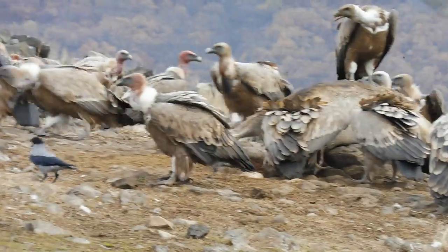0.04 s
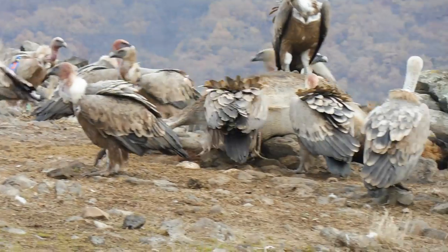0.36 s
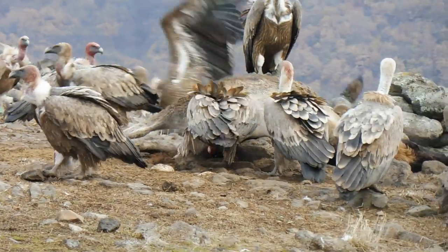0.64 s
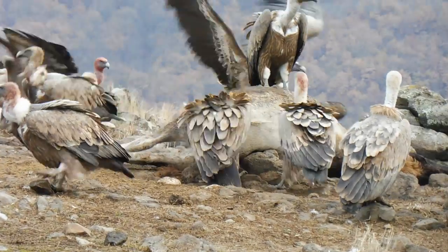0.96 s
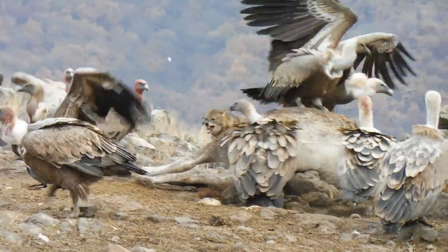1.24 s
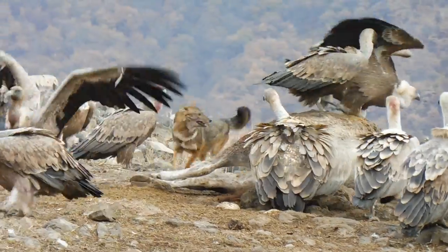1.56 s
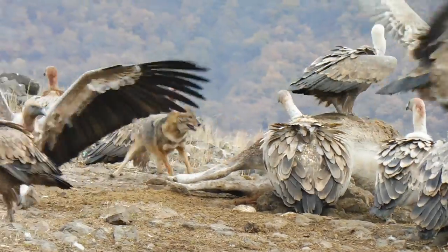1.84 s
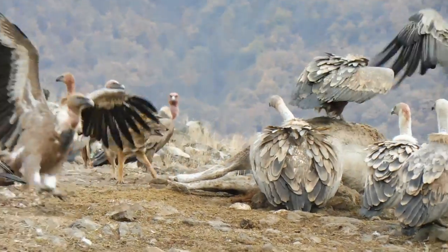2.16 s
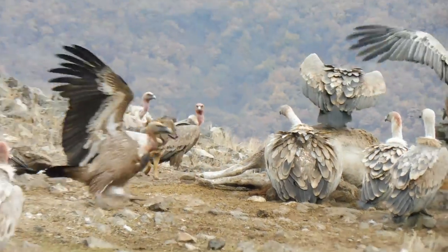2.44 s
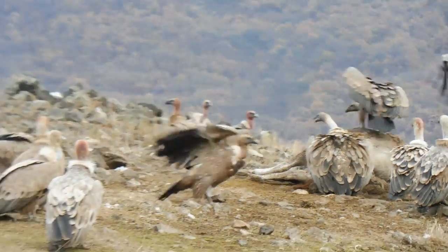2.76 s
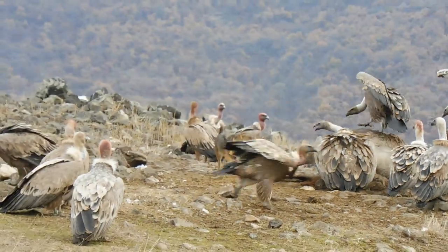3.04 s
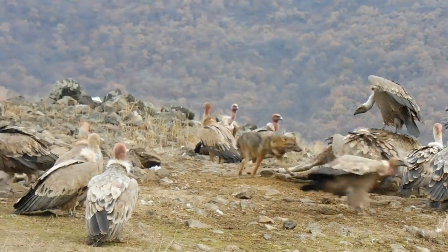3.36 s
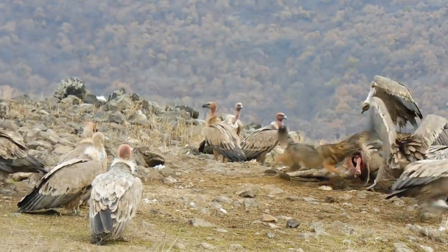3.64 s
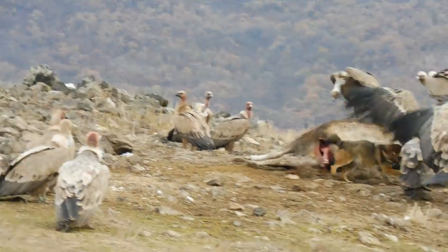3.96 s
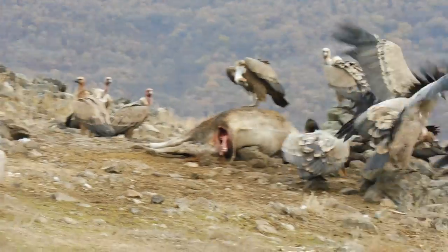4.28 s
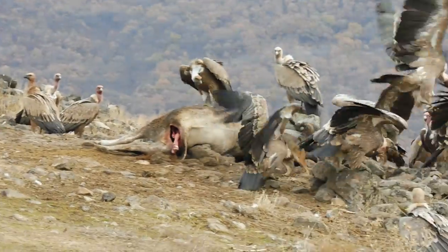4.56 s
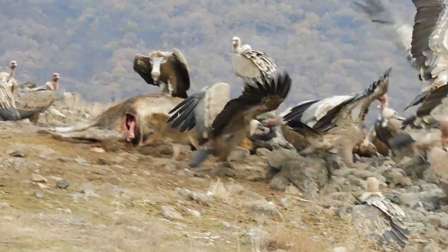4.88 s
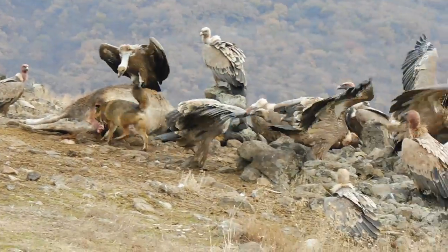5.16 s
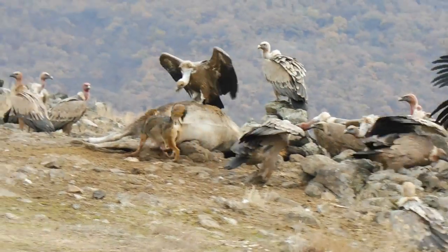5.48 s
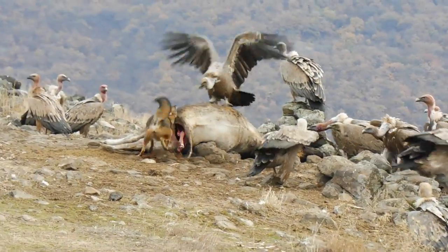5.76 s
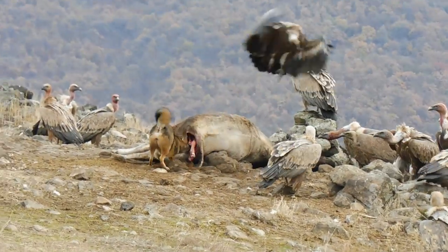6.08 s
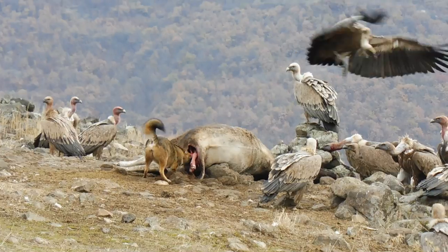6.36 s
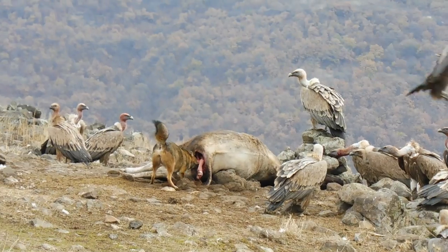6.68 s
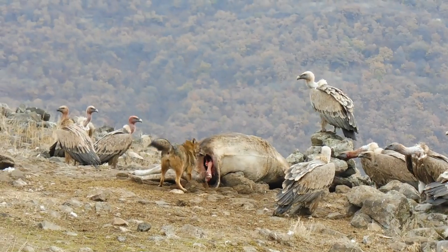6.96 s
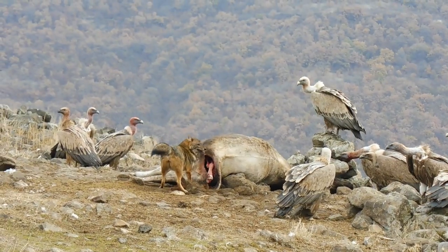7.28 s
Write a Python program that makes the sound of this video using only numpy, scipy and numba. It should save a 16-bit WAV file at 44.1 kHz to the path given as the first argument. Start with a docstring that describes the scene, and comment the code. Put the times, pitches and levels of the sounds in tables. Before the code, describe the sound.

Vultures give two harsh, rasping hisses edged with brief whistles, while wings and feet scuff dry ground in faint wind.

```python
"""Vultures at a carcass

Griffon vultures squabble with a jackal on a stony hillside. Air forced through throat and beak makes
two long, harsh hisses that swell and break into brief whistles. Wings and feet scuff the dry ground
and land with soft thuds. Faint wind lies behind. Close by, a camera hisses, ticks, knocks twice in
the hand and runs its zoom motor, which starts with a fading rasp."""
import sys
import numpy as np
from scipy import signal
from scipy.fft import rfft, irfft, next_fast_len
from scipy.io import wavfile
from numba import njit

SR = 44100
rng = np.random.default_rng(int(sys.argv[2]) if len(sys.argv) > 2 else 0)


def transcribe(signal):
    """Save signal, clipped to [-1, 1], as a 16-bit WAV file at the path in sys.argv[1]."""
    frames = np.atleast_2d(signal).T
    limited = np.clip(frames, -1, 1)
    pcm = np.round(limited * 32767).astype(np.int16)
    wavfile.write(sys.argv[1], SR, pcm)


N = 331632
TIME = np.arange(N) / SR

# Pushes of air, one curve each: t/s, effort/dB, beak opening (gain on the beak resonance)/dB
PUSH_CURVES = [
    [(3.745, -43, -4), (3.759, -46.5, 6), (3.775, -37.5, -1.5), (3.831, -39, -1), (3.843, -32.5, -2.5),
     (3.905, -36.5, 5), (3.927, -32.5, 1), (4.039, -36.5, 5), (4.085, -47, 8)],
    [(4.095, -48, 10), (4.113, -38.5, 8.5), (4.139, -33.5, -1), (4.209, -27.5, -3), (4.221, -32.5, 2),
     (4.245, -32, -9), (4.275, -42.5, -3), (4.32, -46, -3)],
    [(5.625, -51, 2), (5.739, -41, 6.5), (5.769, -31, 4), (5.847, -28, 4), (5.897, -25.5, -5.5),
     (5.921, -29, 1), (5.973, -33, -8.5), (6.001, -41, 5), (6.03, -48, -21)],
]
# Airway per push: throat f/Hz, width/Hz, level/dB; beak f/Hz, width/Hz, level/dB; jet level/dB;
# chest f/Hz, level/dB, fade/(dB/s); pitch sag/(oct/s)
AIRWAYS = [(2025, 1160, 1.5, 3280, 1950, 0, -18, 370, -20.5, 4, 0.0505),
           (2030, 880, 3, 3340, 1100, -0.5, -15, 345, -22.5, 3, 0.107),
           (2000, 990, 2.5, 2850, 650, 0, -12.5, 460, -25.5, 0, .55)]
# Spectra of the windpipe and of the jet at the beak: f/Hz, level/dB
WINDPIPE_SPECTRUM = [(300, -24), (850, -23), (1080, 9), (1200, -5.5), (1310, 4.5), (1450, 0), (1850, 4),
                     (2300, 2), (2900, 4), (3700, 3), (4700, 1), (5100, -20), (6500, 0.5), (12000, -2)]
JET_SPECTRUM = [(2500, -37), (4200, 3), (4900, 7), (5250, 5.5), (5500, -3), (5800, 3), (6400, -2.5),
                (7900, -9), (8600, -12.5), (11000, -16), (13000, -19)]
# Whistles: peak t/s, swell/s, fall/s, level/dB, f/Hz, glide/(oct/s), harmonics 2 and 3/dB, jitter/ratio
WHISTLE_TONES = [(3.931, 0.081, 0.063, -23.5, 2284, -0.22, -25, -25.5, 0.021),
                 (3.995, .04, 0.11, -31.5, 2154, -0.082, -18, -25, 0.016),
                 (4.125, 0.0212, .03, -30.5, 2312, 0, -25, -21, 0.018),
                 (5.633, 0.016, .045, -36, 1183, 0, 14, 1, 0.0054),
                 (5.705, 0.043, 0.063, -37.5, 1243, -.3, 9, -5.5, .014),
                 (5.998, 0.028, 0.027, -33, 1332, -1.04, -9, -9, 0.011)]
# Chest growls: centre t/s, sigma/s, level/dB, f/Hz, glide/(oct/s)
GROWL_TONES = [(3.869, .05, -48.5, 345, 1), (3.972, .02, -46, 345, -2), (4.131, 0.019, -42, 330, -0.5),
               (4.172, .02, -46, 350, 3)]
# Scuffs of wings and feet, plus the zoom motor's fading rasp at 1.89 s: t/s, level/dB, t60/s, strokes
SCUFF_EVENTS = [(.303, -49.5, 0.13, 1), (.868, -51.5, 0.092, 1), (1.36, -54.5, .3, 1),
                (1.886, -50, 0.84, 1), (2.788, -44, 0.074, 1), (3.709, -37.5, 0.26, 3),
                (3.959, -38.5, 0.31, 3), (4.63, -53.5, .35, 1), (5.92, -37, 0.22, 3),
                (6.162, -38.5, 0.21, 3), (6.295, -49.5, .16, 1)]
# Spectrum of those scuffs and that rasp: f/Hz, level/dB
SCUFF_SPECTRUM = [(60, -24), (150, -26), (400, 2), (600, -5), (780, 3.5), (980, 2), (1180, -5), (1700, 4),
                  (2500, -5), (3200, -1), (5000, -3.5), (6200, -14), (7500, -9), (12000, -12.5)]
# Dry ticks and knocks: t/s, level/dB, f/Hz, t60/s
TICK_EVENTS = [(.322, -49.5, 2190, 0.031), (1.8894, -34.5, 3080, .02), (1.9073, -33.5, 1630, 0.027),
               (2.0428, -38, 1470, 0.018), (2.8033, -33.5, 4070, 0.019), (2.9188, -32, 3680, 0.017),
               (2.969, -43.5, 3400, .026), (3.361, -46, 2970, 0.01), (4.3294, -32, 2160, 0.036),
               (4.3784, -35.5, 1900, 0.036), (4.6444, -36.5, 2600, 0.01), (7.4974, -43.5, 1990, .031)]
# Soft low thuds of feet and wings, plus two camera-handling knocks near 4.35 s:
# t/s, level/dB, f/Hz, half length/s
THUD_EVENTS = [(.872, -50.5, 396, 0.008), (1.11, -56, 125, 0.015), (1.275, -51, 128, .012),
               (2.32, -53, 610, 0.012), (2.375, -54, 290, 0.026), (4.332, -45, 171, .004),
               (4.384, -47, 170, 0.0043), (4.641, -53, 145, 0.02), (4.682, -48, 342, 0.0056),
               (5.044, -47, 485, 0.0088), (5.23, -52, 327, 0.014), (5.272, -50, 470, 0.012),
               (7.507, -52, 365, .011)]
# Flurries in the flock: centre t/s, half length/s, rise/dB
FLOCK_FLURRIES = [(0.046, 0.23, 5.5), (1.3, 0.38, 5), (2.306, 0.41, 5), (4.543, .55, 6.5), (6.203, 0.57, 2)]
# Spectra of wind, far rustle and camera hiss: f/Hz, level/dB
WIND_SPECTRUM = [(25, -11.5), (60, -4.5), (100, -2), (140, 1), (260, 1), (400, -1.5), (700, -2.5),
                 (1500, -30)]
RUSTLE_SPECTRUM = [(400, -26), (900, 1.5), (1400, 4.5), (2100, 3.5), (3500, 0), (6000, -5), (13000, -11.5)]
CAMERA_SPECTRUM = [(30, -0.5), (150, -12), (450, -0.5), (750, 2), (1040, 4.5), (1200, -10), (2500, -31),
                   (6000, -4), (13000, -13)]
# Resonances of camera hiss and zoom motor: f/Hz, width/Hz, level/dB
CAMERA_RESONANCES = [(4875, 880, 0), (7500, 1240, -2)]
ZOOM_RESONANCES = [(2400, 1700, 0), (4970, 570, 4.5), (7700, 570, 0.5), (9170, 1800, -4)]


def vultures():
    """Two pushes of air make the first call, one the second; whistles and growls ride on them."""
    return sum(hiss(curve, airway) for curve, airway in zip(PUSH_CURVES, AIRWAYS)) + whistles() + growls()


def hiss(curve, airway, throat_oct_per_db=.005, chest_oct_per_db=.006, jet_follow=.54, chest_follow=.33):
    """Turbulent air rings chest, throat and beak, then leaves as a bright, spitting jet."""
    (throat_hz, throat_width_hz, throat_db, beak_hz, beak_width_hz, beak_db,
     jet_db, chest_hz, chest_db, chest_fade_db_per_s, sag_oct_per_s) = airway
    at, out = around(curve), np.zeros(N)
    effort_db, opening_db = along(curve, TIME[at])
    age_s = TIME[at] - (curve[0][0] + curve[-1][0]) / 2
    sag = 2 ** (-sag_oct_per_s * age_s)
    throat_hz = throat_hz * sag * 2 ** (throat_oct_per_db * opening_db)
    chest_hz = chest_hz * sag * 2 ** (chest_oct_per_db * (effort_db - np.mean(curve, axis=0)[1]))
    slack_db = effort_db - effort_db.max()
    chest_db = chest_db - (1 - chest_follow) * slack_db - chest_fade_db_per_s * age_s
    chop = rasp(flap_hz=230, wander=.25, depth=.4)[at]
    air = rng.standard_normal((4, N))[:, at] * chop
    deep, front = [windpipe(x, echo=.4, round_trip_s=.00308, stretch=.02) for x in air[:2]]
    tip = windpipe(air[2], echo=.55, round_trip_s=.0015, stretch=.04)
    spit_db = 1.8 * drift(70)[at]
    throat = cavity(colour(deep, WINDPIPE_SPECTRUM), throat_hz, throat_width_hz)
    beak = cavity(colour(front, WINDPIPE_SPECTRUM), beak_hz * sag, beak_width_hz)
    jet = unit_rms(colour(tip, JET_SPECTRUM))
    chest = unit_rms(cavity(air[3], chest_hz, width_hz=300) + rough_tone(chest_hz))
    sound = from_db(throat_db) * throat + from_db(beak_db + opening_db) * beak
    sound += from_db(jet_db + jet_follow * opening_db + spit_db) * jet + from_db(chest_db) * chest
    out[at] = sound * from_db(effort_db) * gate(curve, TIME[at], edge_s=.022)
    return out


def rasp(flap_hz, wander, depth):
    """Soft tissue flaps unevenly and chops the air stream."""
    return unit_rms(1 + depth * np.cos(phase_of(flap_hz * (1 + wander * drift(59.07)))))


def windpipe(x, echo, round_trip_s, stretch):
    """Echoes in the long, flexing neck comb-filter the air noise."""
    n = np.arange(len(x))
    lag = round_trip_s * SR * (1 + stretch * drift(7)[:len(x)])
    return x + sum(echo ** k * np.interp(n - np.round(k * lag), n, x) for k in (1, 2))


def whistles(drop_db=14, bend_oct_per_db=.004):
    """The air stream locks on to an unsteady tone that swells, falls and sags as it weakens."""
    out, wobble, shake = np.zeros(N), drift(147), from_db(2 * drift(150))
    for peak_s, swell_s, fall_s, db, hz, glide_oct_per_s, second_db, third_db, jitter in WHISTLE_TONES:
        span = [(peak_s - swell_s,), (peak_s + fall_s,)]
        at = around(span)
        age_s = TIME[at] - peak_s
        envelope_db = -drop_db * np.maximum(-age_s / swell_s, age_s / fall_s)
        octaves = glide_oct_per_s * age_s + bend_oct_per_db * envelope_db
        phase = phase_of(hz * 2 ** octaves * (1 + jitter * wobble[at]))
        tone = sum(from_db(h) * np.sin(k * phase) for k, h in enumerate((0, second_db, third_db), 1))
        out[at] += unit_rms(tone) * shake[at] * from_db(db + envelope_db) * gate(span, TIME[at], .013)
    return out


def growls():
    """Short, low chest tones swell and glide under the hisses."""
    out = np.zeros(N)
    for centre_s, sigma_s, db, hz, glide_oct_per_s in GROWL_TONES:
        at = around([(centre_s - sigma_s,), (centre_s + sigma_s,)])
        age_s = TIME[at] - centre_s
        envelope = from_db(db) * np.exp(-.5 * (age_s / sigma_s) ** 2)
        out[at] += envelope * rough_tone(hz * 2 ** (glide_oct_per_s * age_s))
    return out


def rough_tone(hz):
    """Thin chest tone, shaky in pitch and level; unit rms."""
    phase = phase_of(hz * (1 + .055 * drift(110)[:len(hz)]))
    return unit_rms(np.sin(phase) * from_db(1.2 * drift(70)[:len(hz)]))


def scuffs(gap_s=.0384, growth_db=.78):
    """Dying crackles: strokes of wings and feet on dry ground, and the zoom motor starting."""
    power = np.zeros(N)
    for start_s, db, t60_s, strokes in SCUFF_EVENTS:
        for k in range(strokes):
            at, envelope = burst(start_s + k * gap_s, t60_s, rise_s=.0019)
            power[at] += (from_db(db + k * growth_db) * envelope) ** 2
    grains = rng.standard_normal(N) * from_db(3 * drift(240))
    return np.sqrt(power) * unit_rms(colour(grains, SCUFF_SPECTRUM))


def ticks():
    """Small hard contacts ring briefly, broad and heavily damped."""
    out, white = np.zeros(N), rng.choice([-1., 1.], N)
    for start_s, db, hz, t60_s in TICK_EVENTS:
        at, envelope = burst(start_s, t60_s, rise_s=.00018)
        ring = band(band(white[at], hz, .79 * hz), hz, 3.2 * hz)
        out[at] += from_db(db) * envelope * unit_rms(ring)
    return out


def thuds(rows):
    """Soft contacts: a push of a few cycles and a dull puff at the same pitch."""
    out, white, phases = np.zeros(N), rng.standard_normal(N), rng.uniform(0, 2 * np.pi, N)
    for (centre_s, db, hz, half_s), phase in zip(rows, phases):
        at = np.flatnonzero(abs(TIME - centre_s) < .1)
        age_s = TIME[at] - centre_s
        push = np.sin(2 * np.pi * hz * age_s + phase)
        puff = unit_rms(double_band(white[at], hz, 2 * hz))
        out[at] += from_db(db) * np.exp(-(age_s / half_s) ** 2) * (.8 * push + .55 * puff)
    return out


def hoot(centre_s=2.412, db=-39, hz=230, half_s=.016):
    """One brief, hollow, low tone swells and dies."""
    age_s = TIME - centre_s
    return from_db(db) * np.exp(-np.minimum((age_s / half_s) ** 2, 50)) * np.sin(2 * np.pi * hz * age_s)


def patter(calm_per_s=5, calm_db=-65, spread_db=4, low_hz=131, high_hz=424, half_cycles=3.4):
    """Faint random footfalls, denser and stronger in a flurry."""
    when, chance, pitch = rng.random((200, 3)).T
    t_s = when * N / SR
    hz = low_hz * (high_hz / low_hz) ** pitch
    db = calm_db + flurry_db(t_s) + spread_db * rng.standard_normal(len(t_s))
    lands = chance < calm_per_s * from_db(flurry_db(t_s)) * N / SR / len(t_s)
    return thuds(np.transpose([t_s, db, hz, half_cycles / hz])[lands])


def flurry_db(t_s):
    """The flock's stir above calm."""
    return sum(db * np.exp(-((t_s - centre_s) / half_s) ** 2) for centre_s, half_s, db in FLOCK_FLURRIES)


def hillside(wind_db=-67, rustle_db=-63, rustle_follow=.72):
    """Lumpy low wind and the flock's far rustle, both lifted by flurries of wings."""
    stir_db = flurry_db(TIME)
    gusts_db, flicks_db = 1.6 * drift(14), 1.3 * drift(20)
    wind = from_db(wind_db + stir_db + gusts_db) * noise(WIND_SPECTRUM)
    return wind + from_db(rustle_db + rustle_follow * stir_db + flicks_db) * noise(RUSTLE_SPECTRUM)


def camera(hiss_db=-61, ring_db=-62, zoom_db=-58.5, flutter_db=2, zoom_start_s=1.88, zoom_stop_s=2.95):
    """Steady hiss and one whirring run of the zoom motor."""
    steady = from_db(hiss_db) * noise(CAMERA_SPECTRUM)
    steady += from_db(ring_db) * resonant_noise(CAMERA_RESONANCES)
    motor = from_db(zoom_db + flutter_db * drift(25)) * resonant_noise(ZOOM_RESONANCES)
    return steady + motor * gate([(zoom_start_s,), (zoom_stop_s,)], TIME, edge_s=.057)


def from_db(db):
    """Decibels to gain."""
    return 10 ** (np.asarray(db) / 20)


def unit_rms(x):
    """Scale to unit rms."""
    return x / np.sqrt(np.mean(x ** 2) + 1e-20)


def phase_of(hz):
    """Running phase in radians."""
    return 2 * np.pi * np.cumsum(hz) / SR


def along(curve, t_s):
    """Each value column of a curve at t_s."""
    knots_s, *columns = np.transpose(curve)
    return [np.interp(t_s, knots_s, column) for column in columns]


def gate(curve, t_s, edge_s):
    """One while a curve lasts, zero from edge_s outside it."""
    return np.clip(1 + np.minimum(t_s - curve[0][0], curve[-1][0] - t_s) / edge_s, 0, 1) ** 2


def around(curve):
    """Sample indices of a curve, with margins."""
    return np.arange(int((round(curve[0][0], 1) - .15) * SR), int((round(curve[-1][0], 1) + .15) * SR))


def burst(start_s, t60_s, rise_s):
    """Indices and envelope of a quick rise and exponential decay."""
    at = np.arange(int(start_s * SR), min(int((start_s + t60_s) * SR), N))
    age_s = (at - at[0]) / SR
    return at, (1 - np.exp(-age_s / rise_s)) * from_db(-60 * age_s / t60_s)


def colour(x, spectrum):
    """Filter by a curve of (f/Hz, level/dB) points."""
    size = next_fast_len(len(x))
    hz, db = np.transpose(spectrum)
    log_hz = np.log(np.fft.rfftfreq(size, 1 / SR) + 1)
    return irfft(rfft(x, size) * from_db(np.interp(log_hz, np.log(hz), db)), size)[:len(x)]


def noise(spectrum):
    """Coloured noise; unit rms."""
    return unit_rms(colour(rng.standard_normal(N), spectrum))


def resonant_noise(modes):
    """Noise ringing in rounded resonances; unit rms."""
    return unit_rms(sum(from_db(db) * double_band(rng.standard_normal(N), hz, width_hz)
                        for hz, width_hz, db in modes))


def drift(rate_hz):
    """Smooth random wander below rate_hz; unit rms."""
    r = np.exp(-2 * np.pi * rate_hz / SR)
    return unit_rms(signal.lfilter([1], [1, -2 * r, r * r], rng.standard_normal(N + SR))[SR:])


def band(x, hz, width_hz):
    """Static resonance, unity peak gain."""
    r = np.exp(-np.pi * width_hz / SR)
    feedback = [1, -(1 + r * r) * np.cos(2 * np.pi * hz / SR), r * r]
    return signal.lfilter(np.array([1, 0, -1]) * (1 - r * r) / 2, feedback, x)


def double_band(x, hz, width_hz):
    """Static resonance, passed twice."""
    return band(band(x, hz, width_hz), hz, width_hz)


@njit
def moving_band(x, w, r):
    """Resonance with moving centre w/(rad/sample) and pole radius r."""
    y = np.zeros(len(x))
    for i in range(2, len(x)):
        drive = (1 - r * r) / 2 * (x[i] - x[i - 2])
        y[i] = drive + (1 + r * r) * np.cos(w[i]) * y[i - 1] - r * r * y[i - 2]
    return y


def cavity(x, hz, width_hz):
    """Moving resonance, passed twice for steep flanks; unit rms."""
    w, r = 2 * np.pi * hz / SR, np.exp(-np.pi * width_hz / SR)
    return unit_rms(moving_band(moving_band(x, w, r), w, r))


def scene():
    """Mono sum in open air, no reverberation."""
    return (vultures() + scuffs() + ticks() + thuds(THUD_EVENTS) + hoot()
            + hillside() + camera() + patter())[None]


def record(dry):
    """Steep low-pass at 12.6 kHz."""
    return signal.sosfilt(signal.ellip(12, .2, 80, 12600, fs=SR, output="sos"), dry)


dry = scene()
out = record(dry)
transcribe(out)
```